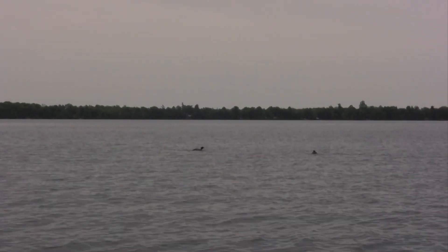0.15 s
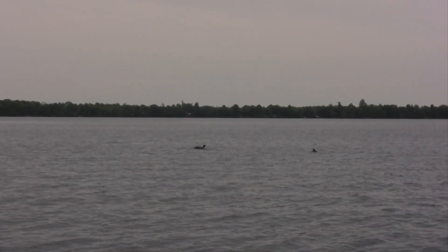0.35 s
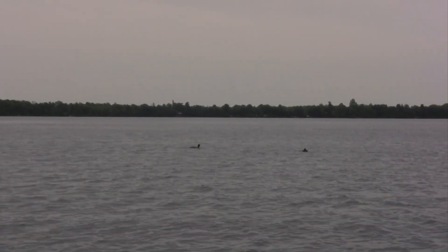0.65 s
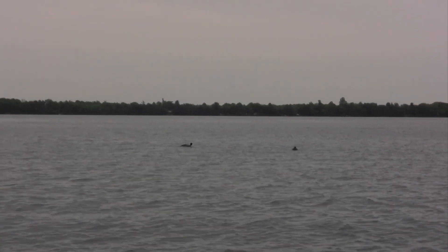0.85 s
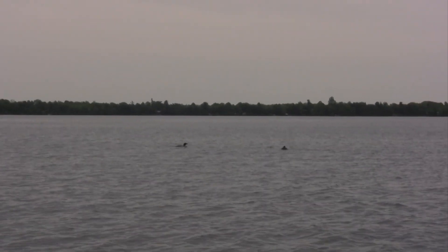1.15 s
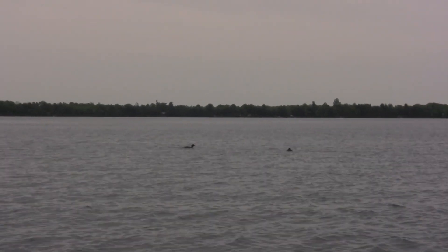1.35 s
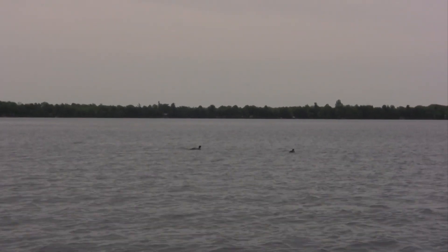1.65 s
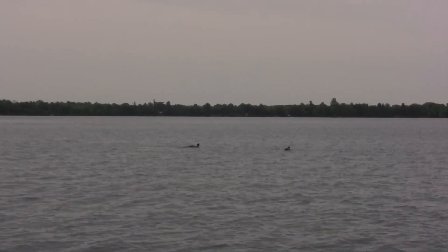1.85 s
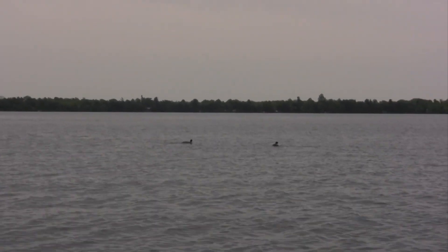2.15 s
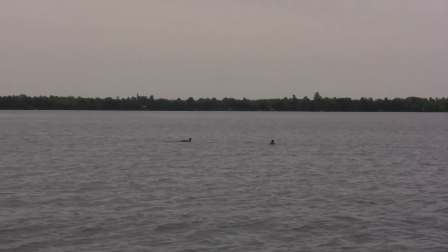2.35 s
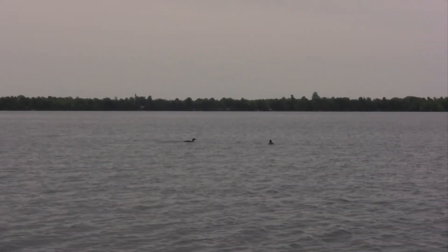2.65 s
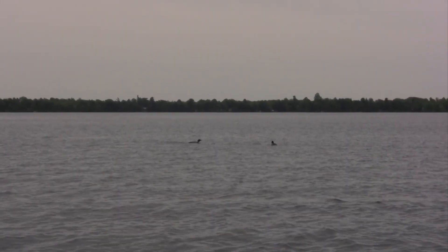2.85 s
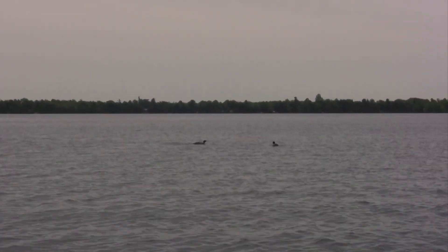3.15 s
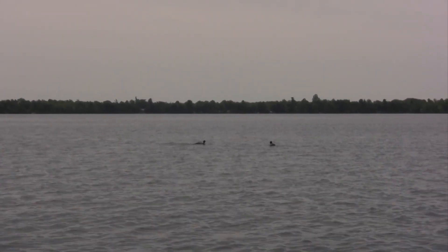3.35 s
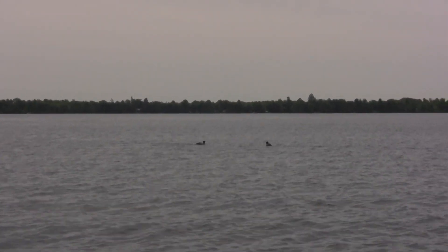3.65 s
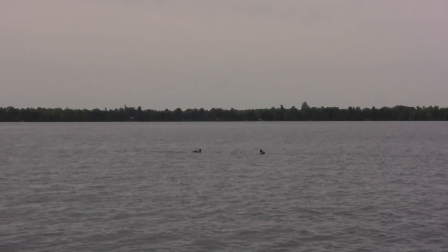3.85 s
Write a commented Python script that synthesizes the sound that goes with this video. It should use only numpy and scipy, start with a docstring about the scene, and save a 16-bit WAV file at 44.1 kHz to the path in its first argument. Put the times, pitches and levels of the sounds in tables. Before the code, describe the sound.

A loon calls loudly from 0 seconds, leaping upward into a sustained, slowly rising whistle-like wail until about 0.6. After a short gap, a second phrase from 0.9 to 1.95 swoops up, drops and breaks upward again, slightly rougher. Shores return a soft tail and faint echoes. Low wind rumbles on the close stereo microphone throughout, with distant wash, light hiss, scattered water ticks, plops and very faint songbird whistles.

```python
"""A loon yodels on a wide lake: gliding near-pure tones that overlap and break between windpipe
resonances, with overtones shaped from the summed wave. Wooded shores return it as noise tails and echoes.
Wind is flickering low noise on the microphone, over a far wash and hiss. Wavelets tick as ringing
noise bursts and plop as dying sines; a far songbird whistles in short glides."""
import sys
import numpy as np
from scipy import signal
from scipy.fft import rfft, irfft
from scipy.io import wavfile
from scipy.ndimage import uniform_filter1d

SR = 44100
rng = np.random.default_rng(int(sys.argv[2]) if len(sys.argv) > 2 else 0)


def generate_wav(signal):
    """Clip the signal to [-1, 1] and save it as 16-bit WAV at the path in sys.argv[1]."""
    frames = np.transpose(np.atleast_2d(signal))
    scaled = np.clip(frames, -1, 1) * 32767
    pcm = np.round(scaled).astype(np.int16)
    wavfile.write(sys.argv[1], SR, pcm)


N = 176400


def undb(db):
    """Amplitude factor of a level in dB."""
    return 10 ** (np.asarray(db) / 20)


def level(x, db):
    """Scale x to an RMS level in dB."""
    return x * undb(db) / np.sqrt(np.mean(x ** 2))


def read(table, order=1):
    """A column of a time table, interpolated at every sample."""
    table = np.array(table)
    return np.interp(np.arange(N) / SR, table[:, 0], table[:, order])


def over_hz(table):
    """A (frequency, value) table at every FFT bin, interpolated over log frequency."""
    table = np.array(table)
    bin_hz = np.arange(1, N // 2 + 2) * SR / N
    return np.interp(np.log(bin_hz), np.log(table[:, 0]), table[:, 1])


def colour(x, table):
    """Filter x by a (frequency, dB) table."""
    return irfft(rfft(x) * undb(over_hz(table)), N)


def walk(rate_hz):
    """Random values held 1 / rate_hz and slewed twice; RMS 1."""
    hold = int(SR / rate_hz)
    steps = np.repeat(rng.standard_normal(N // hold + 1), hold)
    slewed = uniform_filter1d(uniform_filter1d(steps, hold), hold)
    return level(slewed[:N], 0)


def add(out, start_s, x):
    """Mix x into out at start_s, cut at the end."""
    i = int(start_s * SR)
    out[i:i + len(x)] += x[:max(N - i, 0)]


def note(table):
    """One gliding note as a turning phasor, faded at both ends."""
    fade_s = 0.00093
    t = np.arange(N) / SR
    gate = np.clip(np.minimum(t - table[0][0], table[-1][0] - t) / fade_s, 0, 1)
    hz = uniform_filter1d(read(table), size=500)
    amplitude = np.sqrt(2) * undb(read(table, order=2)) * gate
    return amplitude * np.exp(2j * np.pi * np.cumsum(hz) / SR)


def loon():
    """Overlapping notes, fluttering and breathy; powers of the summed wave's phase give the overtones."""
    # Voice, one table per note between breaks: (time [s], pitch [Hz], level [dB])
    notes = [
        [(0, 1236, -12.5), (.03, 1244, -19), (.055, 1326, -19.5), (.07, 1239, -29.5), (.125, 1283, -27),
         (.138, 1260, -38.5)],
        [(.03, 1480, -34.5), (.055, 1490, -21.5), (.068, 1489, -8), (.12, 1504, -10.5), (.135, 1502, -14.5),
         (.148, 1554, -26)],
        [(.045, 1732, -37), (.075, 1720, -24), (.115, 1707, -20.5), (.14, 1736, -10.5), (.18, 1742, -10),
         (.42, 1805, -8), (.55, 1856, -9), (.585, 1870, -12), (.605, 1805, -11.5), (.625, 1665, -23)],
        [(.616, 1094, -36), (.626, 1093, -37), (.64, 868, -43.5)],
        [(.923, 634.5, -39), (.937, 655.3, -19.5), (.946, 795, -24)],
        [(.94, 969, -27.5), (.951, 1056, -11.5), (.958, 1102, -16), (.964, 1230, -26.5)],
        [(.96, 1556, -36), (.97, 1716, -10), (.992, 1786, -8.5), (1.08, 1849, -8), (1.11, 1860, -15),
         (1.14, 1816, -10), (1.18, 1755, -14), (1.21, 1698, -11), (1.232, 1665, -27)],
        [(1.214, 1580, -25), (1.228, 1499, -11), (1.255, 1396, -15.5), (1.292, 1343, -33)],
        [(1.286, 967, -40), (1.298, 950.6, -22.5), (1.36, 890.4, -35), (1.378, 902, -23), (1.394, 1011, -14.5),
         (1.407, 1168, -26)],
        [(1.399, 1502, -23), (1.412, 1693, -10.5), (1.432, 1825, -10), (1.448, 1830, -8), (1.465, 1856, -24.5)],
        [(1.431, 2037, -30.5), (1.457, 2104, -15), (1.535, 2008, -18), (1.552, 1934, -35.5)],
        [(1.538, 1777, -26), (1.552, 1750, -12.5), (1.6, 1681, -17.5), (1.65, 1665, -16.5), (1.75, 1707, -15),
         (1.79, 1808, -11), (1.84, 1780, -14), (1.885, 1823, -12.5), (1.915, 1732, -12.5), (1.938, 1650, -34.5)],
        [(1.923, 1200, -34.5), (1.94, 1071, -16), (1.952, 983, -28.5), (1.968, 955, -46)],
    ]
    # Neighbouring windpipe resonances beside the note: (time [s], each side tone against the note [dB])
    flutter_db = [(.9, -63), (.98, -22.5), (1.05, -40.5), (1.115, -20.5), (1.16, -34), (1.2, -35),
                  (1.41, -38), (1.445, -11.5), (1.49, -59), (1.55, -15), (1.6, -22.5), (1.68, -41),
                  (1.89, -21)]
    # Breath around the voice: (time [s], level against the note [dB])
    breath_db = [(.6, -48.5), (1.0, -45.5), (1.55, -36.5), (1.9, -37.5)]
    # Breath roughening the overtones, high ones more: (time [s], modulation depth [dB])
    rasp_db = [(.6, -38), (1., -22), (1.5, -10)]
    # Fall of the third harmonic and up: (time [s], slope [dB per harmonic])
    roll_off_db = [(.1, -13), (.15, -2.5), (.55, -0.5), (.95, -3.5), (1.08, -6), (1.2, -4), (1.85, 0)]
    # Strength of the third harmonic and up: (time [s], gain [dB])
    upper_db = [(.05, 3.5), (.07, -15.5), (.13, -10), (.2, -8), (.55, 4), (1.25, 3.5), (1.6, -4)]
    # Throat response to all overtones: (frequency [Hz], gain [dB])
    throat = [(1300, -6.5), (2150, -8), (2500, -27.5), (3600, -26.5), (4300, -30), (5400, -50.5),
              (7400, -60.5), (9300, -54.5), (11500, -69), (14000, -72)]
    flutter_hz, flutter_wander_hz = 219.5, 44.73
    breath_cutoff_hz = 1330
    jitter_over_breath_db = 12.5  # phase jitter, dB re 1 rad above the breath level
    full_voice_db, thinning_power = -10.5, 0.57  # overtones thin out below this amplitude
    waver_db = 4.5  # each overtone wavers alone, the second harmonic half as much

    voice = sum(note(table) for table in notes)
    flutter = np.cos(2 * np.pi * np.cumsum(flutter_hz + flutter_wander_hz * walk(40)) / SR)
    air = signal.lfilter(*signal.butter(2, breath_cutoff_hz, fs=SR), rng.standard_normal((2, N)))
    air_a, air_b = level(air[0], 0), level(air[1], 0)
    breath = undb(read(breath_db)) * (air_a + 1j * air_b)
    voice = voice * (1 + 2 * undb(read(flutter_db)) * flutter + breath)
    voice = voice * np.exp(1j * undb(read(breath_db) + jitter_over_breath_db) * walk(150))

    # Each multiplication by turn moves the voice up one harmonic
    size = np.abs(voice)
    turn = voice / (size + 1e-9) * np.minimum(size / undb(full_voice_db), 1) ** thinning_power
    rasp = undb(read(rasp_db))
    slope_db = read(roll_off_db)
    second = (voice * turn).real * (1 + rasp * air_b) * undb(waver_db * walk(25) / 2)
    upper = 0
    for k in range(2, 8):
        rough = (1.5 + k * rasp * air_a) / np.hypot(1, k * rasp)
        gain = undb((k - 1) * slope_db + waver_db * walk(25))
        upper = upper + (voice * turn ** k).real * rough * gain
    return voice.real + colour(second + undb(read(upper_db)) * upper, throat)


def shores(x):
    """Convolve with shaped noise: a short tail off the water, a long haze off the woods, smeared echoes."""
    # Clear echoes of far shores: (delay [s], spread [s], level [dB])
    echoes = [(0.779, 0.0088, -45), (0.841, 0.013, -39)]
    near_db, near_t60_s = -23.5, 0.32
    woods_db, woods_t60_s = -31.5, 2.5
    gap_s = .02  # silence before both tails
    t = np.arange(N) / SR

    def tail(t60_s):
        """Exponential decay after the gap, RMS 1."""
        return level(np.exp(-np.log(1000) * t / t60_s) * (t > gap_s), 0)

    shape = undb(near_db) * tail(near_t60_s) + undb(woods_db) * tail(woods_t60_s)
    for delay_s, spread_s, db in echoes:
        shape = shape + level(np.exp(-((t - delay_s) / spread_s) ** 2), db)
    response = shape * rng.standard_normal(N) / np.sqrt(N)
    return signal.fftconvolve(x, response)[:N]


def wind():
    """Rumble on the microphone: noise whose octaves flicker alone under a shared gust."""
    # Gusts: (time [s], wind level before flicker [dB])
    gust_db = [(0, -25), (.5, -31), (.83, -23.5), (1.55, -25.5), (2.4, -25.5), (3.25, -23), (4, -27)]
    # Wind spectrum: (frequency [Hz], relative level [dB per Hz])
    spectrum = [(15, -5.5), (43, -1.5), (80, 2.5), (190, -9.5), (258, -14), (700, -49.5), (910, -56),
                (1540, -120)]
    flicker_db = 1.73  # per octave; half as much on the gust
    hz = np.arange(N // 2 + 1) * SR / N
    gust = undb(read(gust_db) + flicker_db * walk(6.8) / 2)
    bins = rfft(rng.standard_normal(N)) * undb(over_hz(spectrum))
    rumble = 0
    for low_hz in 12.5 * 2. ** np.arange(7):
        octave = irfft(bins * (hz >= low_hz) * (hz < 2 * low_hz), N)
        rumble = rumble + undb(flicker_db * walk(6 + low_hz / 20)) * octave
    return level(rumble, 0) * gust


def lake():
    """Smooth far wash as shared coloured noise, and microphone hiss unrelated left and right."""
    # Wash spectrum: (frequency [Hz], relative level [dB per Hz])
    wash_spectrum = [(200, -38.5), (400, -2), (862, -4.5), (1230, -10.5), (1750, -9.5), (3230, -10.5),
                     (5040, -25), (15700, -27.5)]
    # Softer start of wash and hiss: (time [s], gain [dB])
    start_gain_db = [(.6, -2.5), (.9, 1.5)]
    wash_db, hiss_db = -55, -66.5  # before the start gain
    wash = level(colour(rng.standard_normal(N), wash_spectrum), wash_db) * undb(.5 * walk(2.4))
    hiss = signal.lfilter(*signal.butter(2, 4000, "high", fs=SR), rng.standard_normal((2, N)))
    return (wash + level(hiss, hiss_db)) * undb(read(start_gain_db))


def tick(db, centre_hz, noise):
    """A breaking wavelet: resonant noise plus a broader, faster-dying snap."""
    t60_s, q = 0.029, 2.6
    snap_db = -9.5  # against the ring, before the shared decay
    decay = np.exp(-np.log(1000) * np.arange(len(noise)) / SR / t60_s)
    attack = np.minimum(np.arange(len(noise)) / SR * 2000, 1)
    resonance = signal.iirpeak(centre_hz, q, fs=SR)
    ring = signal.lfilter(*resonance, signal.lfilter(*resonance, noise))
    snap_band = signal.butter(2, [centre_hz / 3, centre_hz * 0.79], "band", fs=SR)
    snap = signal.lfilter(*snap_band, noise) * decay
    return (level(ring, db) + level(snap, db + snap_db)) * decay * attack / 2


def plop(length_s, start_hz, end_hz, db):
    """A pocket of air or a hollow knock: a gliding, dying sine."""
    t = np.arange(int(length_s * SR)) / SR
    hz = start_hz * (end_hz / start_hz) ** (t / length_s)
    attack = 1 - np.exp(-t / 0.00068)
    decay = np.exp(-2.5 * t / length_s) * (1 - t / length_s)
    return undb(db) * np.sin(2 * np.pi * np.cumsum(hz) / SR) * attack * decay


def water():
    """Clear ticks and plops of wavelets, with faint random ones between."""
    # Clear ticks: (start [s], RMS level before decay and halving [dB], centre [Hz])
    ticks = [(0.103, -32.5, 3670), (0.114, -40.5, 4870), (0.227, -36, 3300), (.576, -45, 7200),
             (1.327, -36, 3940), (1.348, -35, 3300), (1.358, -29, 3060), (1.403, -32.5, 4650),
             (1.42, -21, 3900), (1.444, -43.5, 8170), (1.477, -51, 7000), (1.495, -42.5, 6260),
             (1.511, -43.5, 5000), (1.959, -31.5, 2820), (2.117, -28, 2400), (2.234, -46.5, 4710),
             (2.262, -36, 2200), (2.319, -45, 4800), (2.365, -37.5, 3870), (2.677, -39.5, 3420),
             (2.74, -36.5, 2300), (2.791, -36.5, 2800), (2.9, -36.5, 3900), (2.91, -33.5, 3180),
             (2.918, -31, 3170), (3.003, -47, 3000), (3.16, -43.5, 3780), (3.455, -32, 1990),
             (3.569, -45.5, 4930), (3.747, -36, 1550), (3.754, -45.5, 4670)]
    # Plops and knocks: (start [s], length [s], start pitch [Hz], end pitch [Hz], amplitude before envelope [dB])
    plops = [(.225, 0.013, 615, 770, -29.5), (.36, 0.062, 760, 755, -37), (0.548, 0.081, 391, 473, -30.5),
             (1.355, 0.007, 646, 1010, -16), (1.444, 0.049, 407, 420, -27), (1.446, 0.012, 754, 790, -20.5),
             (1.491, 0.0053, 1085, 1150, -16.5), (1.689, 0.02, 257, 326, -13.5),
             (2.11, 0.037, 757, 970, -36.5), (2.282, 0.033, 1310, 1150, -34),
             (2.912, 0.04, 1110, 1050, -29), (3.257, 0.05, 748, 3090, -34), (3.311, 0.032, 572, 603, -31),
             (3.382, 0.037, 1033, 1064, -33.5), (3.414, 0.036, 997, 1660, -34),
             (3.436, 0.018, 656, 704, -30), (3.759, 0.034, 1725, 1765, -32)]
    spray_per_s, spray_floor_db = 8.3, -57.5
    lap_per_s, lap_floor_db, lap_cycles = 180, -45.5, 8.1
    out = np.zeros(N)
    for start_s, db, centre_hz in ticks:
        add(out, start_s, tick(db, centre_hz, rng.standard_normal(1024)))
    for start_s, *shape in plops:
        add(out, start_s, plop(*shape))
    for place, loud, pitch in rng.random((int(spray_per_s * N / SR), 3)):
        db = spray_floor_db - 3 * np.log(1 - loud)
        add(out, place * N / SR, tick(db, 2000 * 3 ** pitch, rng.standard_normal(1024)))
    for place, loud, pitch, rise in rng.random((int(lap_per_s * N / SR), 4)):
        hz = 300 * 4 ** pitch
        lap = plop(lap_cycles / hz, hz, hz * (1 + 0.22 * rise), lap_floor_db + 8 * loud ** 2)
        add(out, place * N / SR, lap)
    return out


def songbird():
    """Thin whistles: linearly gliding sines under rounded envelopes, flickering in level."""
    # Whistles: (start [s], length [s], start pitch [Hz], end pitch [Hz], amplitude before flicker [dB])
    whistles = [(0.628, 0.035, 2780, 3870, -49), (.765, 0.046, 3930, 2770, -51.5),
                (2.0, 0.052, 2790, 2700, -50), (2.131, 0.069, 4110, 3270, -51),
                (2.17, 0.064, 1950, 2390, -50.5), (2.308, 0.057, 4040, 3200, -51.5),
                (2.48, 0.081, 4090, 3020, -50.5), (2.567, 0.095, 2780, 2630, -52),
                (2.767, 0.094, 2182, 2090, -47), (3.19, 0.029, 2680, 2880, -50),
                (3.767, 0.035, 2840, 3640, -49.5), (3.9, 0.032, 3480, 2790, -52),
                (3.953, 0.028, 3030, 3700, -49.5)]
    out = np.zeros(N)
    for start_s, length_s, start_hz, end_hz, db in whistles:
        size = int(length_s * SR)
        phase = 2 * np.pi * np.cumsum(np.linspace(start_hz, end_hz, size)) / SR
        add(out, start_s, undb(db) * np.sin(phase) * np.sqrt(np.hanning(size)))
    return out * undb(2.5 * walk(120))


def ports(mid):
    """Two close microphone ports: a side signal, strongest in the bass, shifts phase and level between them."""
    # Side sound: (frequency [Hz], level against the shared sound [dB])
    side_db = [(30, -7), (70, -11.5), (150, -19), (300, -23), (600, -31.5), (1500, -38), (3000, -48)]
    lean = .38  # in-phase share, louder on the right
    quarter_turn = signal.hilbert(mid).imag
    side = colour(np.sqrt(1 - lean ** 2) * quarter_turn - lean * mid, side_db)
    return np.array([mid + side, mid - side])


def scene():
    """Direct and reflected birds, water and wind through the ports, over the wash and hiss."""
    song_send_db = 15.5  # far song into the reflections
    bird, song = loon(), songbird()
    reflected = shores(bird + undb(song_send_db) * song)
    return ports(bird + song + reflected + water() + wind()) + lake()


def record(dry):
    """The recorder cuts the top with a steep elliptic low-pass."""
    cutoff_hz = 15800
    top = signal.ellip(12, .2, 70, cutoff_hz, fs=SR, output="sos")
    return signal.sosfilt(top, dry)


dry = scene()
out = record(dry)
generate_wav(out)
```